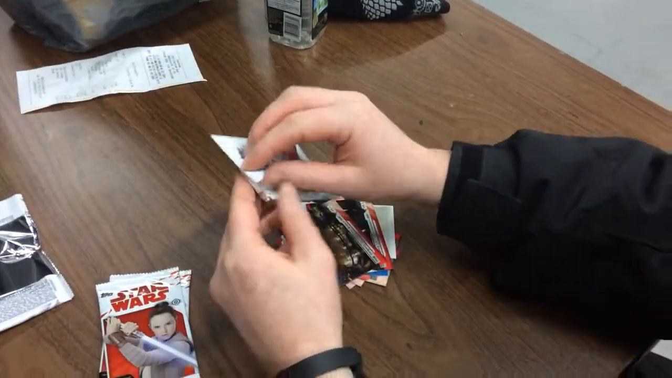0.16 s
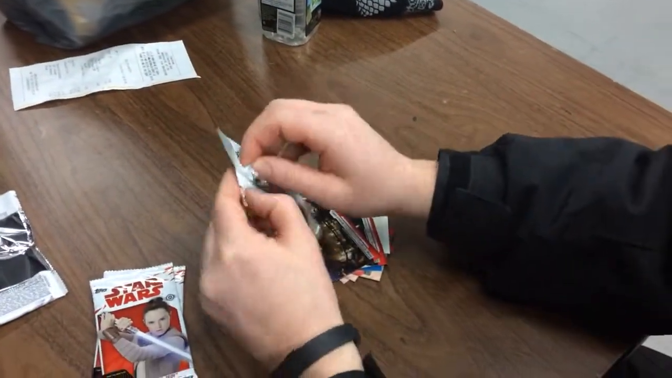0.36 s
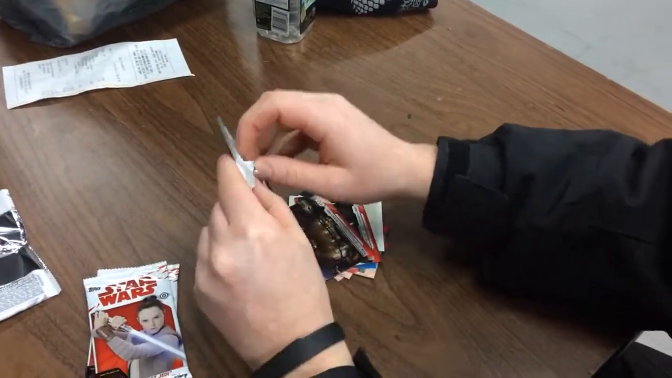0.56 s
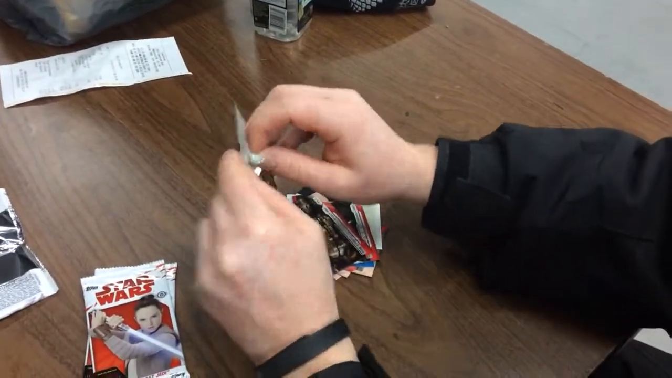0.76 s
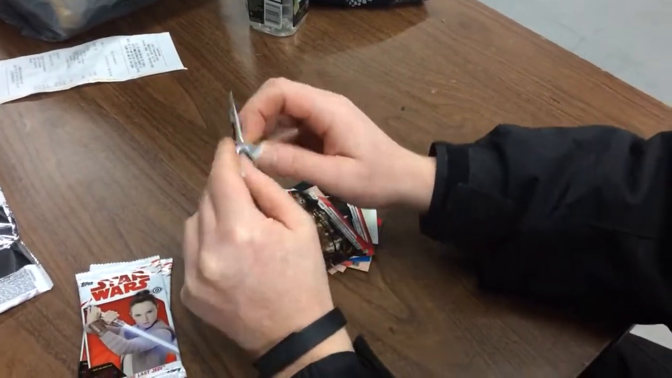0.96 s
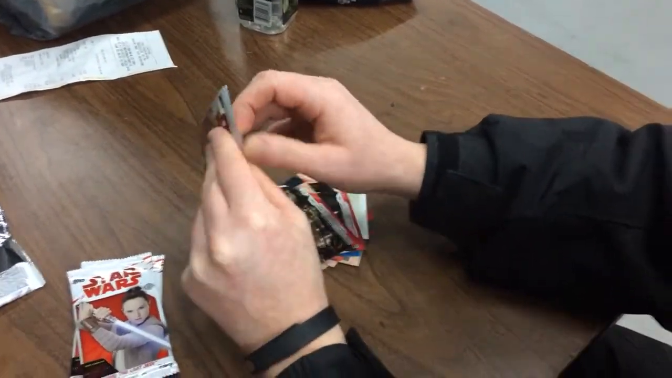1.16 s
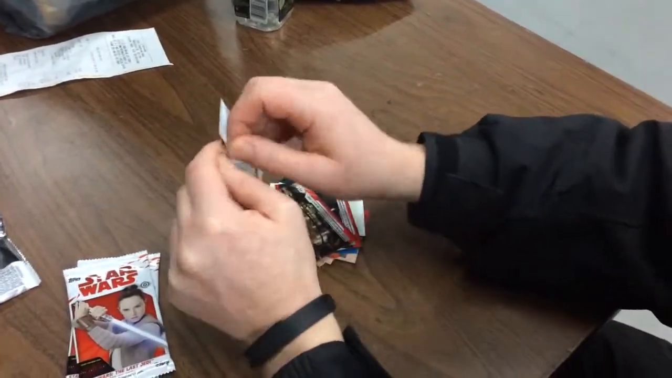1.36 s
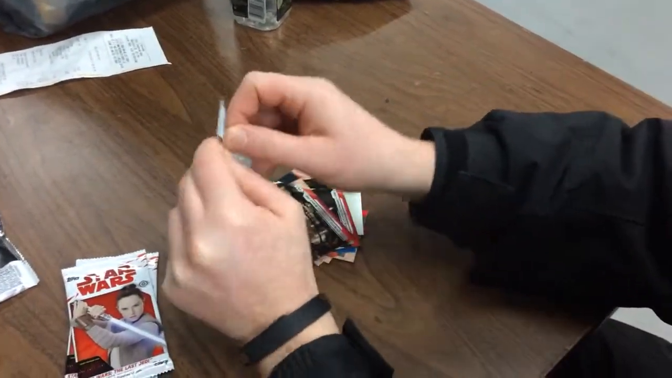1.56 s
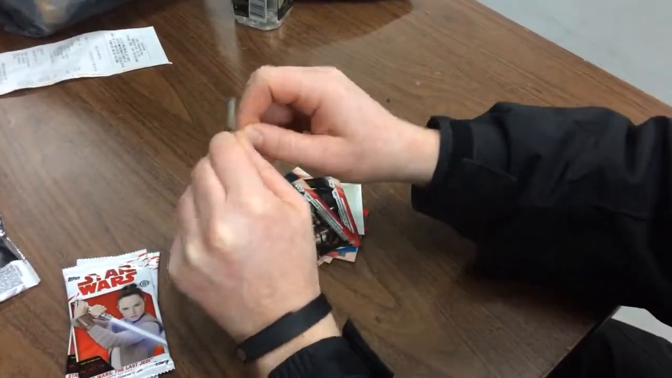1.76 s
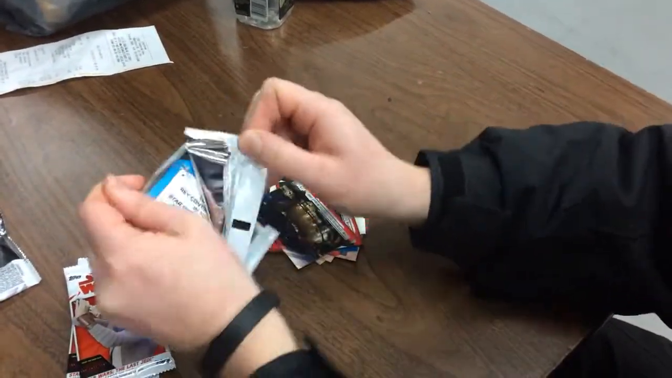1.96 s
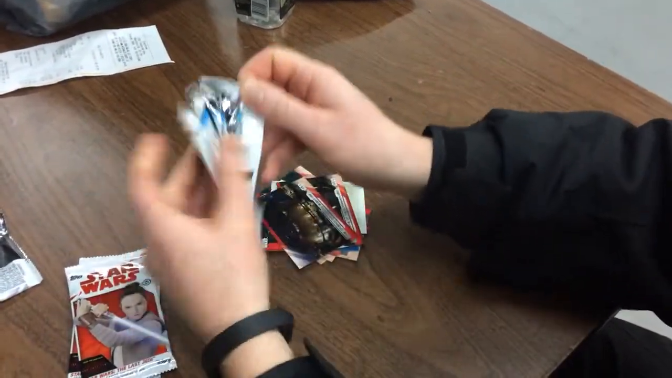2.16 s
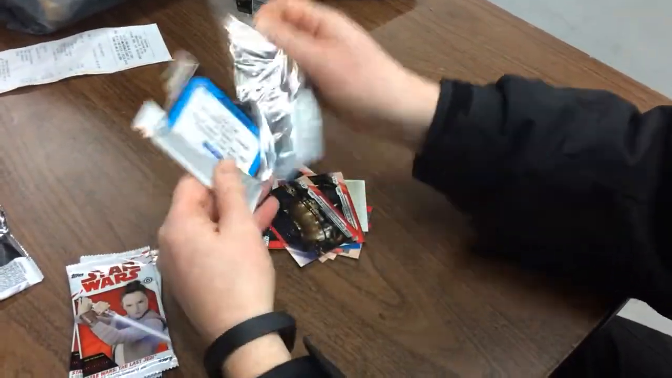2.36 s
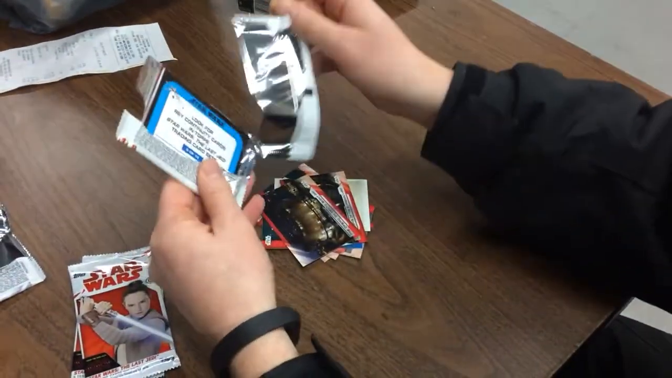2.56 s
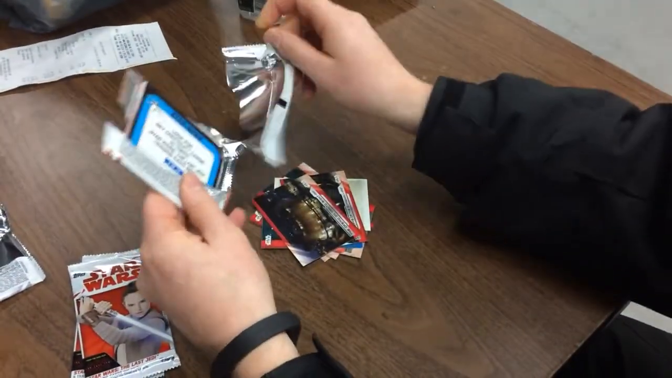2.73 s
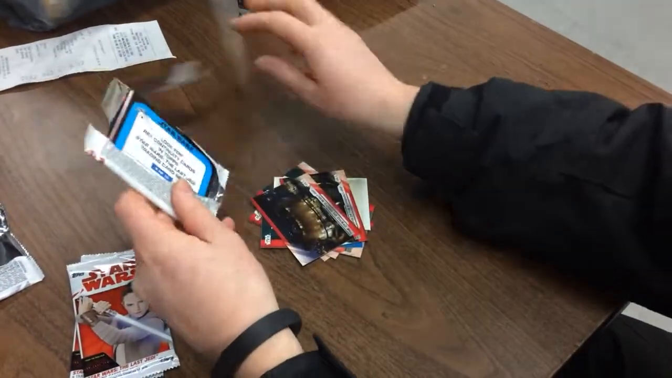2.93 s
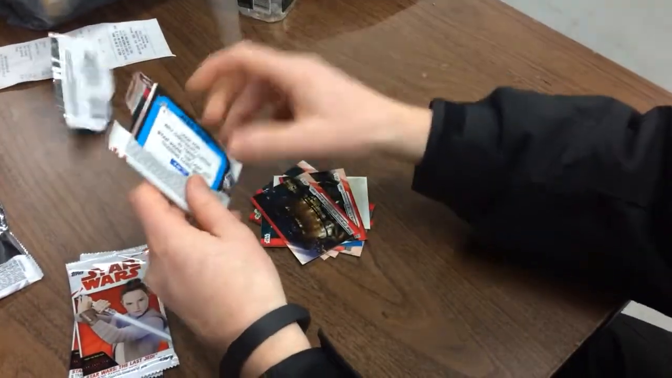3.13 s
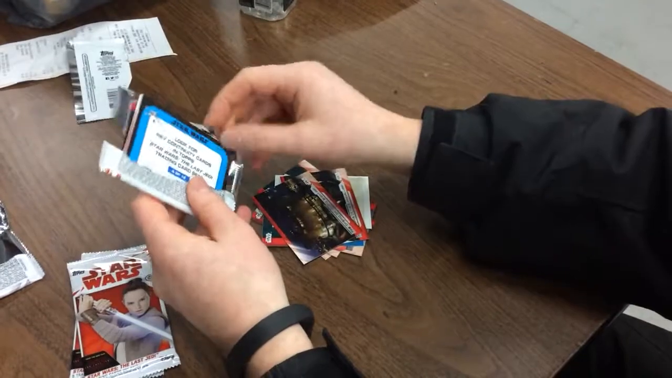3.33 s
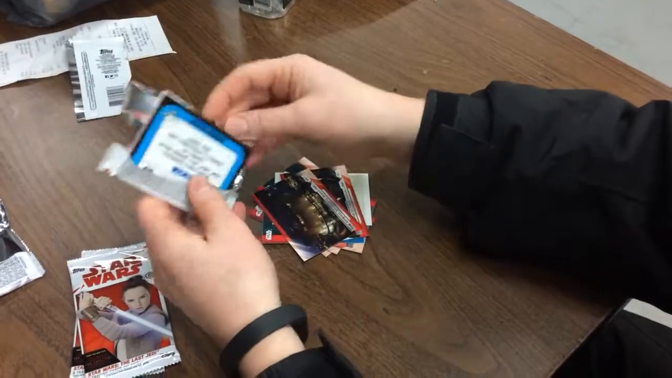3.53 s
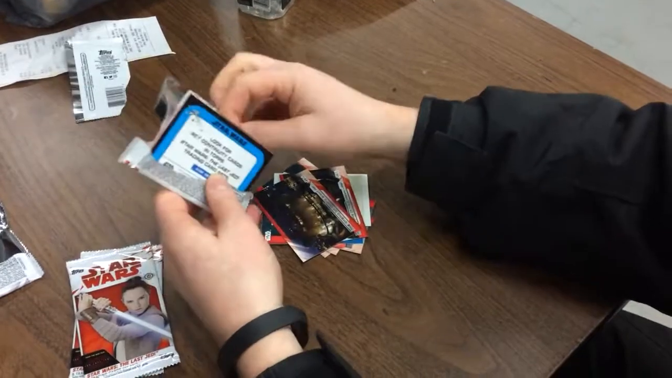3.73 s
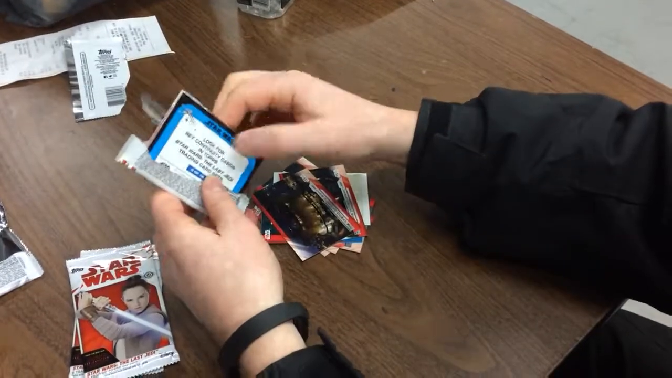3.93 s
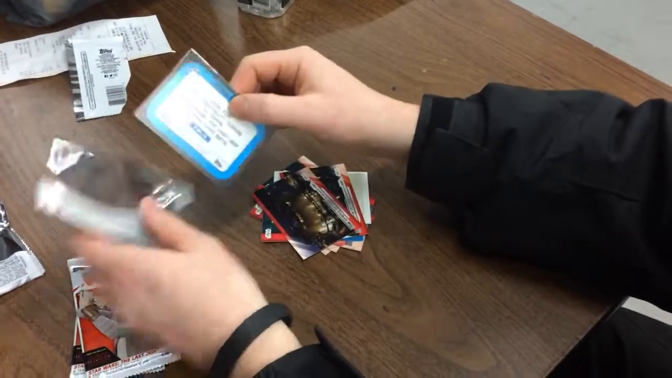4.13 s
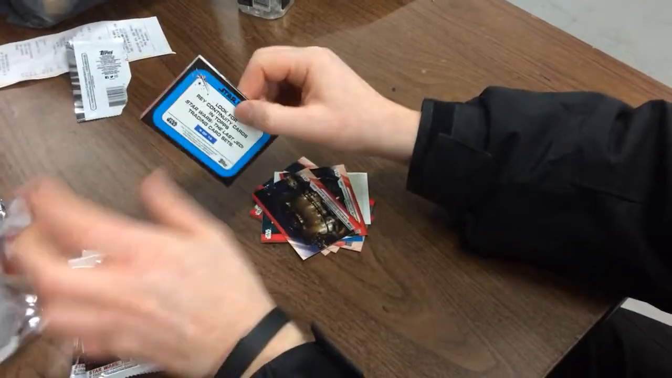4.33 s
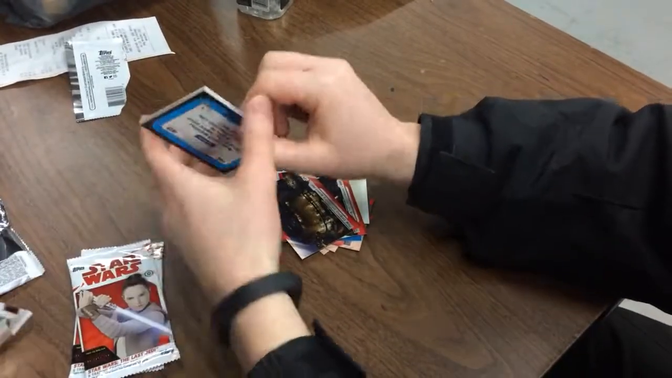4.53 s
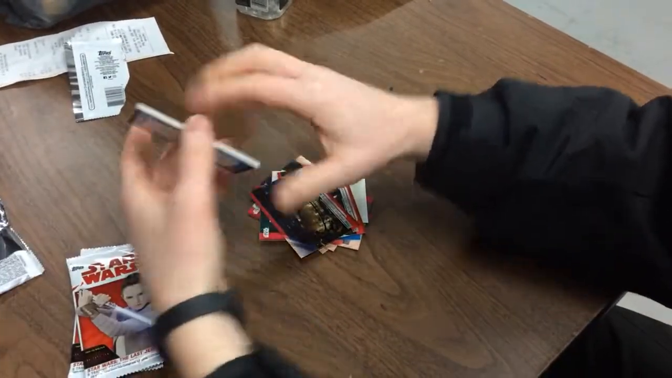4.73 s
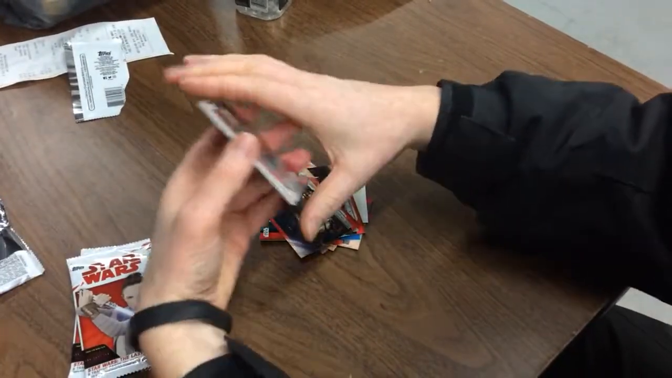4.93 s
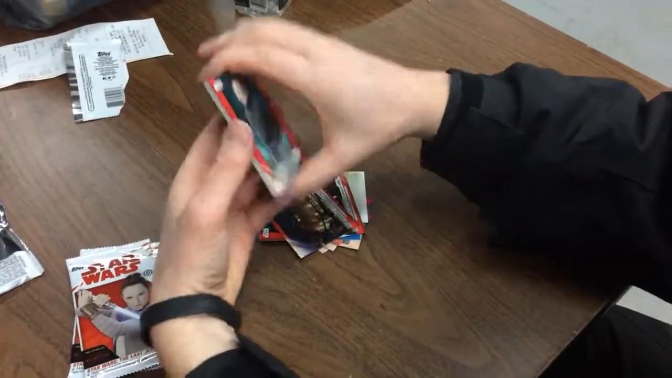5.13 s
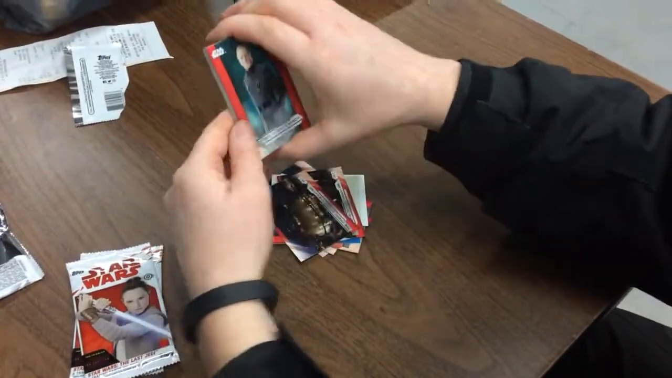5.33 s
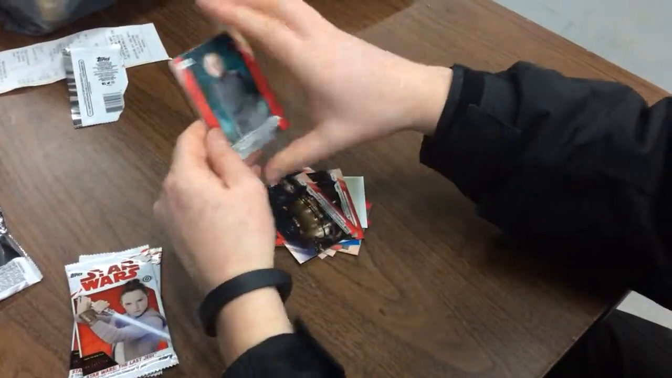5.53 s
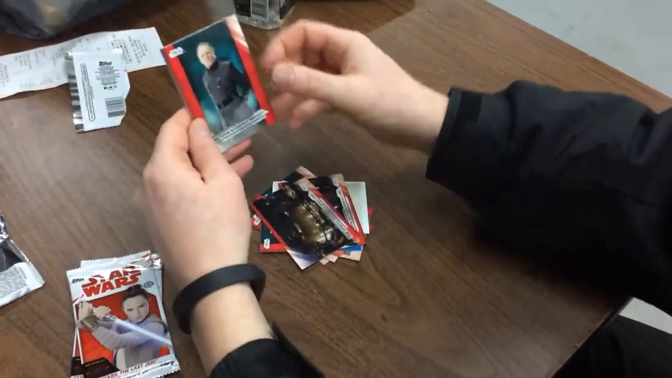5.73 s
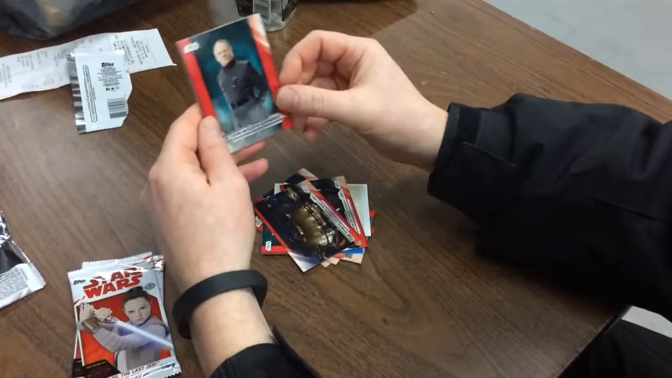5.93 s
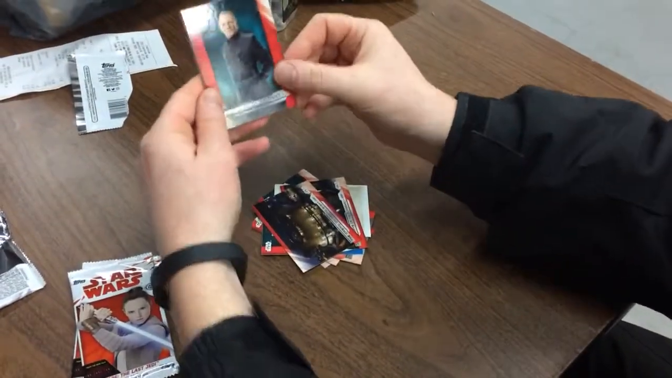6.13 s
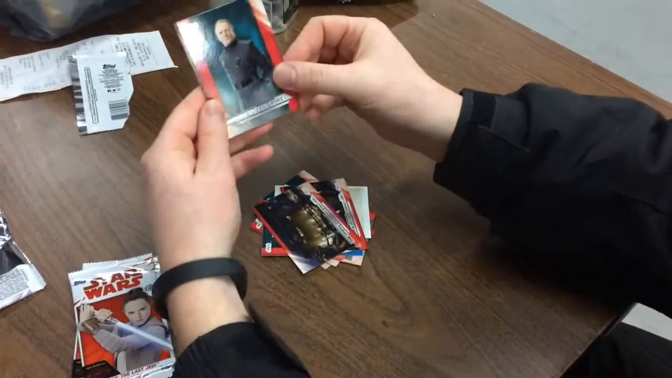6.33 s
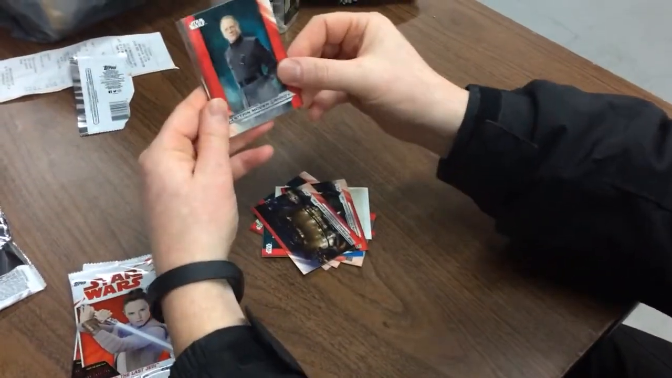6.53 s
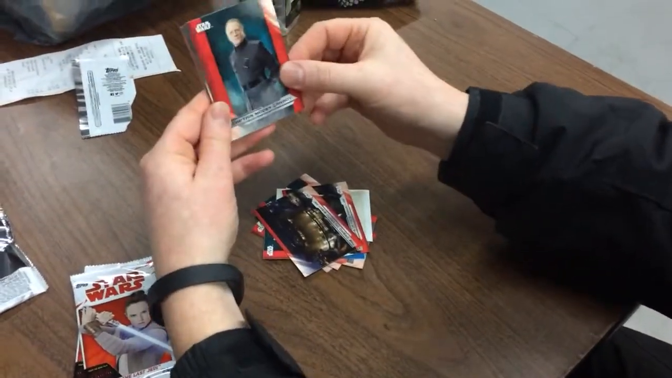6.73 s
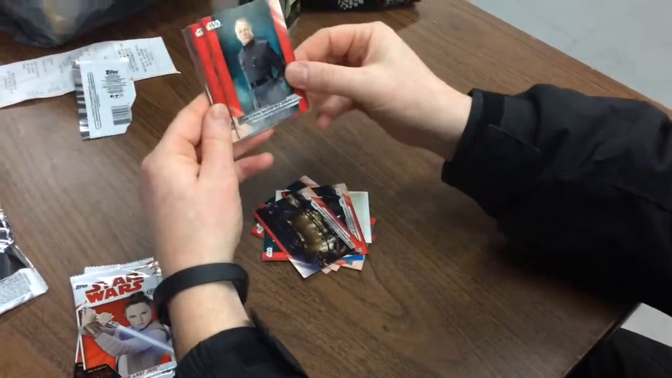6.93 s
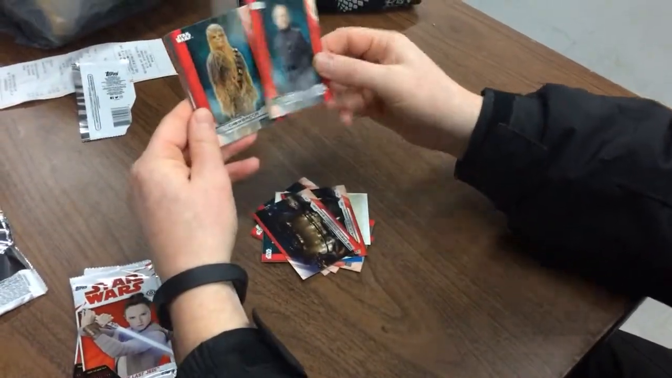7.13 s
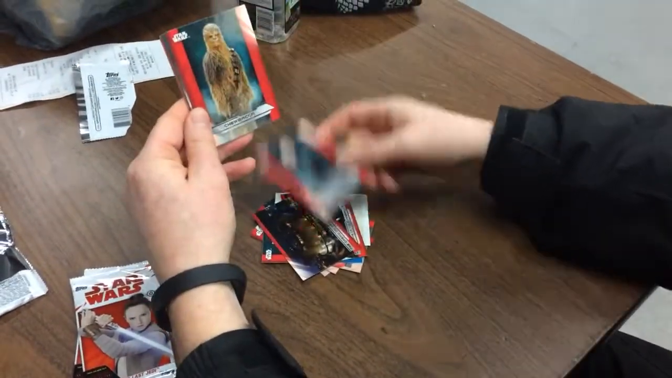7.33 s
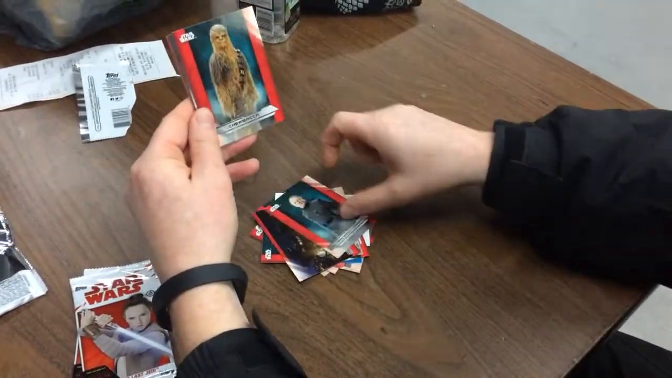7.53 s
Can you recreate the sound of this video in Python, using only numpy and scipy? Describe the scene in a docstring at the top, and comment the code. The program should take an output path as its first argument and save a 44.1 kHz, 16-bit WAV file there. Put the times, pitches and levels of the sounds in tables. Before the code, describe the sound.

Very close to the microphone, fingers pick at a small foil packet with bright sharp snaps and fine crinkle. The crackling peaks in a loud rip and low billowing flap as the wrapper comes away, then thins to scattered ticks and small squeaks. Thin cards slide out, tap and softly rub, ending with a couple of crisp flicks. A quiet indoor room with slight reverberation and a wavering low machine hum.

```python
"""A foil pack of trading cards is picked at, torn open and pulled off by hand, close to the microphone.
Creases buckle in sharp snaps over a fine crinkle; the freed sheet crackles lower and billows as it swings away.
Each crease is a short crack with a cluster of ringing modes; crinkle and tear are trains of tiny creases.
Then cards slide in the fingers as shaped noise, with taps, squeaks and a thumb scuff of ringing modes.
Behind the hands are a short room reverberation, wavering machine hum tones and a low rush of air."""
import sys
import numpy as np
from scipy import signal
from scipy.fft import rfft, irfft
from scipy.io import wavfile
from scipy.ndimage import uniform_filter1d

SR = 44100
rng = np.random.default_rng(int(sys.argv[2]) if len(sys.argv) > 2 else 0)


def pcm_store(signal):
    """Save signal as 16-bit PCM."""
    levels = np.round(np.clip(np.atleast_2d(signal), -1, 1) * 32767)
    wavfile.write(sys.argv[1], SR, levels.astype(np.int16).T)


N = 338895

RING_SIZE = 1024  # samples in one short ring


def from_db(db):
    """Decibels to gain."""
    return 10 ** (np.asarray(db) / 20)


def rms_one(x):
    """Scale to rms 1."""
    return x / np.sqrt(np.mean(x ** 2) + 1e-20)


def energy_one(x):
    """Scale to total energy 1."""
    return x / np.sqrt(np.sum(x ** 2) + 1e-20)


def gain_at(colour, hz):
    """Gain of a spectrum at given frequencies, interpolated over log frequency."""
    points, levels = np.transpose(colour)
    return from_db(np.interp(np.log(hz + 1), np.log(points), levels))


def noise(colour, size=N):
    """Noise of a given colour, rms 1."""
    spectrum = rfft(rng.standard_normal(size))
    return rms_one(irfft(spectrum * gain_at(colour, np.fft.rfftfreq(size, 1 / SR)), size))


def drift(rate_hz):
    """Slow random wandering, rms 1, with rate_hz new values a second."""
    steps = np.arange(N) / SR * rate_hz
    return rms_one(np.interp(steps, np.arange(4096), rng.standard_normal(4096)))


def add(out, s, sound):
    """Mix a sound in at a time in seconds."""
    i = int(np.clip(s * SR, 0, N - 1))
    out[i:i + len(sound)] += sound[:N - i]


def machine():
    """A wavering hum over the low rush of moving air: unsteady tones and coloured noise."""
    # spectrum of the moving air: hz, relative_db
    air_colour = [(25, -24.5), (58, -11.5), (80, -12), (110, -17), (135, -7.5), (175, -11.5), (215, -14),
                  (300, -22.5), (480, -28.5), (750, -34), (1500, -36), (3000, -47.5), (7000, -53.5),
                  (16000, -63)]
    # tones of the machine: hz, rms_db, unsteadiness (0-1)
    hum_tones = [(93.6, -52.5, 0.7), (119.6, -43.5, 0.1), (153.1, -54, 1), (237.4, -63, 0.9),
                 (258.4, -62, 1), (335.7, -63.5, 0.55), (599, -62.5, 0)]
    t = np.arange(N) / SR
    air = noise(air_colour)
    above_hum = signal.sosfiltfilt(signal.butter(4, 170, "high", fs=SR, output="sos"), air)
    out = from_db(-53.0) * air / np.std(above_hum)  # the part above 170 Hz has this level
    for hz, level_db, unsteady in hum_tones:
        waver = np.clip(unsteady, 0, 1)
        # steady part plus random swings of level and phase
        swing = np.sqrt(2 * (1 - waver ** 2)) + waver * (drift(14) + 1j * drift(14))
        turning = np.exp(2j * np.pi * (hz * t + rng.random()))
        out = out + from_db(level_db) * np.real(swing * turning)
    return out


def room(x, first_s=0.0047, build_s=0.003, wall_hz=9000):
    """Dense, slightly dull reflections build up after the direct sound and die away."""
    t60_s, wet_db = 0.55, -21.5
    t = np.arange(SR // 2) / SR
    decay = from_db(-60 * t / t60_s)
    build_up = np.clip((t - first_s) / build_s, 0, 1)
    tail = rng.standard_normal(len(t)) * decay * build_up
    tail = signal.sosfilt(signal.butter(1, min(wall_hz, .45 * SR), fs=SR, output="sos"), tail)
    return from_db(wet_db) * signal.fftconvolve(x, energy_one(tail))[:N]


def crease(hz, crack_share, ring_t60, edge_hz, top_ratio, crack_t60=0.0009, spread_octaves=0.69,
           scatter_db=2.0, spread_s=0.00029):
    """A crease flips: a crack of a few cycles, then the many modes of the facets around it; energy 1."""
    # strength of the facet modes: hz, relative_db
    facet_colour = [(1200, -22), (2550, -16.5), (3250, 5.5), (3900, -1), (4550, 1), (5200, -2.5),
                    (7000, -4.5), (10000, -4), (16000, -1)]
    t = np.arange(RING_SIZE) / SR
    crack = np.cos(2 * np.pi * hz * t) * from_db(-60 * t / crack_t60)
    # a facet this small radiates little below its edge frequency, or far above its own pitch
    top_hz = np.clip(hz * top_ratio, SR / 10, SR / 2.5)
    band = signal.butter(3, [min(edge_hz, top_hz / 2), top_hz], "band", fs=SR, output="sos")
    crack = energy_one(signal.sosfilt(band, crack))
    modes = np.linspace(1200, 16000, 90) + rng.uniform(-80, 80, 90)
    near = np.exp(-(np.log2(modes / hz) / spread_octaves) ** 2 / 2)
    scatter = from_db(scatter_db * rng.standard_normal(len(modes)))
    signs = rng.choice([-1, 1], len(modes))
    strengths = gain_at(facet_colour, modes) * near * scatter * signs
    # bending waves take a moment to spread from the crease over the facets
    envelope = (1 - np.exp(-t / spread_s)) * from_db(-60 * t / ring_t60)
    ring = energy_one(strengths @ np.sin(2 * np.pi * np.outer(modes, t)) * envelope)
    share = np.clip(crack_share, 0, 1)  # of the energy
    return energy_one(np.sqrt(share) * crack + np.sqrt(1 - share) * ring)


def flex(colour, t60, low_hz):
    """A broad sheet answers with a short low ring; held in the fingers it has no deep modes; energy 1."""
    ring = noise(colour, size=RING_SIZE) * from_db(-60 * np.arange(RING_SIZE) / SR / t60)
    return energy_one(signal.sosfilt(signal.butter(3, low_hz, "high", fs=SR, output="sos"), ring))


def deepest_hz(level_db, usual_hz, octaves_per_db=0.08):
    """A stronger buckle moves a larger part of the sheet, which rings deeper."""
    return float(np.clip(usual_hz * 2 ** (-octaves_per_db * (level_db + 40)), 150, 2500))


def runs(rows, jitter=0.3):
    """Each flip sets off the next, a little weaker: one row for every flip."""
    flip_gap_s, flip_loss_db = 0.0055, 1.05  # the gap before jitter, the loss at each flip
    gaps = flip_gap_s * (1 + jitter * rng.uniform(-0.39, 1, (len(rows), 8)))
    flipped = []
    for (s, level_db, hz, low_db, flips), gap in zip(rows, gaps):
        for k in range(int(round(flips))):
            flipped.append((s + gap[:k].sum(), level_db - flip_loss_db * k, hz, low_db))
    return flipped


def snaps(rows, body, crack_share, ring_t60, edge_hz, top_ratio, body_t60, body_low_hz, bright_db, body_db):
    """Each snap is a faint first creep, the crease itself and the sheet or deck that it shakes."""
    creep_s, creep_db = 0.0022, -20  # mean lead over the snap, level against it
    out = np.zeros(N)
    span = np.sqrt(.005 * SR)  # levels are taken over 5 ms
    for s, level_db, hz, low_db in rows:
        bright = from_db(bright_db) * crease(hz, crack_share, ring_t60, edge_hz, top_ratio)
        low_hz = deepest_hz(level_db + low_db, body_low_hz)
        low = from_db(low_db + body_db) * flex(body, body_t60, low_hz)
        creep = crease(hz, crack_share / 2, ring_t60, edge_hz, top_ratio)
        add(out, s - creep_s * (.5 + rng.random()), from_db(level_db + creep_db) * span * creep)
        add(out, s, from_db(level_db) * span * (bright + low))
    return out


def grains(rings, per_s, size_db, even_s, wander=.17, spread=.2):
    """Tiny slips of uneven size come at random, into rings of wandering pitch; running level 1."""
    born = rng.random(N) < per_s / SR
    sizes = from_db(size_db * np.minimum(rng.exponential(1, N), 4))
    sizes = born * sizes * rng.choice([-1, 1], N)
    running_power = np.abs(uniform_filter1d(sizes ** 2, int(even_s * SR) + 1))
    sizes = sizes / np.sqrt(running_power + 1e-6)
    place = .5 + wander * drift(45) + spread * rng.standard_normal(N)
    dealt = (place % 1 * len(rings)).astype(int)  # which ring each slip excites
    out = np.zeros(N)
    for i in np.flatnonzero(born):
        add(out, i / SR, sizes[i] * rings[dealt[i]])
    return out


def sliding(skirt=3.15):
    """Gains of hiss and rub: each slide swells and fades in a smooth bell over a faint hold."""
    # cards slide over foil, fingers or each other:
    # middle_s, bell_width_s, hiss_db (before the trim in cards), rub_db
    slides = [(3.177, 0.016, -51.5, -57), (3.26, 0.96, -65.5, -64), (3.433, 0.047, -52.5, -57),
              (4.131, 0.095, -50.5, -56), (4.2, 0.016, -51, -47), (4.557, 0.3, -67, -64),
              (4.919, 0.47, -61.5, -64.5), (5.813, 0.28, -67.5, -69), (6.215, 0.13, -63.5, -54.5),
              (7.352, 0.32, -61, -57), (7.512, 0.066, -56, -56), (7.647, 0.21, -66, -68)]
    hold_hiss_db, hold_rub_db = -84.5, -70  # cards merely held in the fingers
    t = np.arange(N) / SR
    power = from_db([[hold_hiss_db], [hold_rub_db]]) ** 2
    for middle, width, hiss_db, rub_db in slides:
        bell = (1 + ((t - middle) / width) ** 2 * 2) ** -skirt
        power = power + (from_db([[hiss_db], [rub_db]]) * bell) ** 2
    return np.sqrt(power)


def scuff(t60=0.031):
    """A thumb's quick slips over the top card ring its modes, which sag as it bends, under one smooth stroke."""
    # bending modes of the card at mid-stroke: hz, relative_db
    card_modes = [(440, 1), (670, -1.5), (970, -5), (1450, -4)]
    middle_s, width_s, level_db = 6.207, 0.024, -54
    slips_per_s, sag_oct_per_s = 350, 4.7
    out, t = np.zeros(N), np.arange(2 * RING_SIZE) / SR
    hz, mode_db = np.transpose(card_modes)
    for offset in np.arange(-2 * width_s, 2 * width_s, 1 / slips_per_s):
        modes = np.sin(2 * np.pi * np.outer(hz * 2 ** (-sag_oct_per_s * offset), t))
        strengths = from_db(mode_db) * rng.standard_normal(len(hz))
        ring = energy_one(strengths @ modes * from_db(-60 * t / t60))
        stroke = np.exp(-(offset / width_s) ** 2 / 2)
        add(out, middle_s + offset + rng.random() / slips_per_s, stroke * ring)
    return from_db(level_db) * np.sqrt(SR / slips_per_s) * out


def squeaks(width_hz=700, rise_octaves=0.12):
    """Rapid uneven slips of the card's edge make a rough tone that rises through the stroke."""
    # an edge catches on the foil or the next card: middle_s, bell_width_s, pitch_hz, level_db
    catches = [(3.45, 0.005, 6200, -36.5), (3.857, 0.011, 2720, -44.5), (3.917, 0.0056, 4100, -36.5)]
    out, t = np.zeros(N), np.arange(N) / SR
    stumble = np.sqrt(2 * np.pi * width_hz / SR) * rng.standard_normal(N)  # random phase steps
    for s, width, hz, level_db in catches:
        along = np.clip((t - s) / width, -10, 10)
        phase = np.cumsum(2 * np.pi * hz * 2 ** (rise_octaves * along) / SR + stumble)
        out += from_db(level_db) * np.exp(-along ** 2) * np.sqrt(2) * np.sin(phase)
    return out


def cards():
    """Smooth card faces hiss as they slide, hands rub dully, and the edges tick and knock the deck."""
    # edges flicked, knocked together and laid down:
    # start_s, level_db (over 5 ms, before trims), pitch_hz, low_ring_db (against the tap), flips (count)
    card_taps = [(4.2104, -44.5, 5800, -7, 1), (4.3699, -51, 5300, -8, 1), (4.4094, -48.5, 7100, -14, 1),
                 (4.5129, -56, 6850, 2.5, 1), (4.894, -41.5, 8500, -8, 2), (5.1276, -54.5, 6700, -22, 1),
                 (7.1579, -53, 7250, -7, 1), (7.4832, -46.5, 5080, -1, 1), (7.4932, -39.5, 6100, -1, 2),
                 (7.5187, -38, 3520, -30, 1)]
    # spectrum of card faces sliding: hz, relative_db
    slide_colour = [(1000, -14.5), (2500, -7), (5000, -4.5), (8000, -4), (12000, -7.5), (16000, -16.5)]
    # spectrum of the dull rubbing: hz, relative_db
    rub_colour = [(200, -2.5), (400, -2.5), (700, -10), (1400, -8), (2500, -14), (5000, -25)]
    # spectrum of the knocked deck: hz, relative_db
    deck_colour = [(500, -5), (800, 5), (1150, 5.5), (1500, 2.5), (2300, 3.5), (3500, -6), (6000, -16)]
    grain_db = 1.9  # rms flutter of the rubbing level
    hiss_gain, rub_gain = sliding()
    hiss = hiss_gain * from_db(3.0 + grain_db * drift(250)) * noise(slide_colour)  # 3 dB trim
    rub = rub_gain * from_db(grain_db * drift(120)) * noise(rub_colour)
    taps = snaps(runs(card_taps), deck_colour, crack_share=0.4, ring_t60=0.014, edge_hz=2100, top_ratio=3.0,
                 body_t60=0.018, body_low_hz=550, bright_db=0.5, body_db=0.5)
    return hiss + rub + taps + scuff() + squeaks()


def billow():
    """The freed sheet fills with air as it is swung away: a low flutter swells to a thump and drops."""
    # spectrum of the flutter: hz, relative_db
    flutter_colour = [(170, -25), (270, -7), (480, 2.5), (620, -3.5), (1000, -21)]
    peak_s, level_db = 2.477, -32
    rise_s, fall_s = 0.09, 0.036  # time to rise or fall by 20 dB
    t = np.arange(N) / SR - peak_s
    away = np.clip(np.maximum(-t / rise_s, t / fall_s), 0, 10)
    return from_db(level_db - 20 * away) * noise(flutter_colour)


def pops(t60=0.0096):
    """One broad panel of wrapper or bent card flips like a drum skin, ringing briefly at one low pitch."""
    # panels popping through: start_s, pitch_hz, peak_db
    panels = [(0.8915, 851, -26.5), (1.9692, 1599, -20.5), (2.038, 571.5, -27), (2.3843, 1302, -20),
              (2.435, 1042, -17), (2.474, 483, -18), (4.893, 890, -36)]
    out, t = np.zeros(N), np.arange(2 * RING_SIZE) / SR
    for s, hz, peak_db in panels:
        add(out, s, from_db(peak_db - 60 * t / t60) * np.sin(2 * np.pi * hz * t))
    return out


def tearing(fade_s=0.0059):
    """The running tear parts the film in thousands of tiny fractures a second: a bright, even zip."""
    # the tear runs on through the film: start_s, length_s, level_db
    tears = [(0.284, 0.03, -34.5), (0.395, 0.027, -32), (1.444, 0.03, -42), (1.664, 0.14, -49),
             (2.394, 0.028, -31), (2.456, 0.02, -22.5)]
    t, gain = np.arange(N) / SR, np.zeros(N)
    for start, length, level_db in tears:
        away = np.maximum(start - t, t - start - length) / fade_s  # 20 dB for each fade_s
        gain = np.maximum(gain, from_db(level_db - 20 * np.clip(away, 0, 10)))
    fractures = [crease(hz, crack_share=.5, ring_t60=0.006, edge_hz=3000, top_ratio=2)
                 for hz in np.linspace(3600, 15000, 60)]
    return gain * grains(fractures, per_s=2800, size_db=2.5, even_s=0.01, spread=.5)


def pulling():
    """Gains of crinkle and sheet: each pull builds, holds and lets go, a long one more slowly."""
    # the fingers pinch and pull the wrapper:
    # start_s, hold_s, fine_crinkle_db, sheet_flexing_db (both before the trims in wrapper)
    pulls = [(0.0, 0.07, -58, -70), (0.258, 0.2, -43, -56.5), (0.425, 0.05, -39.5, -57),
             (0.59, 0.043, -42.5, -54.5), (0.753, 0.033, -36.5, -61), (0.864, 0.032, -33, -52.5),
             (1.061, 0.038, -37, -51.5), (1.279, 0.064, -50.5, -61), (1.5, 0.053, -47, -63),
             (1.677, 0.18, -50, -63), (1.955, 0.055, -28.5, -39), (2.02, 0.025, -27.5, -34.5),
             (2.073, 0.18, -50, -54.5), (2.389, 0.1, -28, -34), (2.457, 0.023, -24, -30),
             (2.575, 0.068, -54.5, -55), (2.842, 0.077, -48, -54), (3.892, 0.028, -45.5, -52.5)]
    attack, release = 0.59, 0.9  # time to rise or fall by 20 dB, as a share of the hold
    t, gains = np.arange(N) / SR, np.zeros((2, N))
    for start, hold, fine_db, sheet_db in pulls:
        phase = (t - start) / max(hold, .005)
        away = np.maximum(-phase / attack, (phase - 1) / release)
        gain = from_db([[fine_db], [sheet_db]]) * from_db(-20 * np.clip(away, 0, 10))
        gains = np.maximum(gains, gain)
    return gains


def wrapper():
    """Loud snaps stand out of a crinkle of small creases, stray ticks and the crackle of the bending sheet."""
    # creases giving way, some in a quick run of flips:
    # start_s, level_db (over 5 ms), pitch_hz, low_ring_db (against the snap, before body_db), flips (count)
    foil_snaps = [(0.0392, -40.5, 8600, -14.5, 1), (0.1183, -23.5, 8100, -21, 1),
                  (0.1404, -27.5, 9000, -18, 1), (0.1665, -37, 5200, -16.5, 1),
                  (0.2523, -36, 4800, -11.5, 1), (0.2604, -39, 9000, -5.5, 2), (0.2825, -28, 7900, -12, 1),
                  (0.3459, -36.5, 7500, -4, 1), (0.3097, -24.5, 8300, -30, 1), (0.3291, -22, 6400, -23, 1),
                  (0.3565, -24, 9000, -28, 1), (0.3603, -20, 6800, -29, 1), (0.3656, -26, 5200, -23.5, 1),
                  (0.3769, -25, 8100, -20, 2), (0.4, -29, 9400, -25, 1), (0.4099, -25.5, 8650, -17.5, 2),
                  (0.431, -16.5, 5850, -26, 1), (0.4439, -32.5, 8200, -28, 2),
                  (0.4568, -31.5, 9300, -22, 3), (0.4783, -40.5, 9200, -20, 3),
                  (0.5195, -36, 9300, -11.5, 1), (0.5906, -38.5, 7500, -16.5, 1),
                  (0.6106, -31, 8600, -23, 1), (0.6932, -33.5, 5740, -13.5, 1),
                  (0.7381, -38, 5800, -11.5, 1), (0.7563, -27.5, 7050, -24.5, 2),
                  (0.7761, -30, 8800, -30, 1), (0.7917, -29.5, 12500, -21.5, 1),
                  (0.8691, -21, 6200, -27, 1), (0.8841, -16, 7200, -23.5, 2),
                  (0.9533, -37.5, 8850, -12.5, 1), (0.9665, -37, 9400, -9.5, 1), (1.069, -35, 8700, -20, 1),
                  (1.1169, -33.5, 8600, -12.5, 1), (1.1491, -32, 7600, -41, 1), (1.2884, -31, 6100, -19, 2),
                  (1.3167, -27.5, 5750, -15, 2), (1.337, -26, 4300, -10.5, 1), (1.3796, -27, 7300, -18, 3),
                  (1.4028, -27, 9400, -27, 1), (1.5405, -23.5, 6150, -21, 1), (1.5235, -38, 8000, -9, 1),
                  (1.5525, -37, 7000, -8, 1), (1.837, -38, 7900, -26, 1), (1.9025, -34.5, 7500, -17, 1),
                  (1.6473, -28, 6300, -23, 1), (1.7005, -24.5, 8050, -26, 1), (1.7815, -33, 7560, -16.5, 1),
                  (1.9268, -24.5, 6000, -19.5, 1), (1.9458, -25.5, 10800, -19.5, 1),
                  (1.9568, -26, 8000, -12.5, 2), (1.9697, -25.5, 7000, -11, 1), (1.9808, -28, 5400, -6, 2),
                  (1.9975, -24.5, 7200, -7.5, 1), (2.0372, -27.5, 6200, -3.5, 1),
                  (2.0611, -28, 4570, -9, 1), (2.083, -33, 7050, -7.5, 1), (2.2325, -31, 5500, -10.5, 1),
                  (2.296, -32.5, 6000, -7.5, 1), (2.1499, -26, 7340, -9, 1), (2.1859, -23.5, 7650, -20, 1),
                  (2.2439, -27.5, 5900, -6, 2), (2.282, -19, 6400, -12.5, 1), (2.3304, -19.5, 7700, -12, 1),
                  (2.3635, -22.5, 9000, -24, 1), (2.3848, -21.5, 7340, -5, 1),
                  (2.4015, -27, 5600, -13.5, 1), (2.4115, -21, 6500, -12, 1),
                  (2.4135, -17.5, 5300, -15.5, 1), (2.4215, -20.5, 7800, -16.5, 1),
                  (2.4477, -19.5, 5240, -13, 1), (2.4756, -23, 8700, -9.5, 1), (2.4847, -23.5, 5090, -5, 1),
                  (2.4888, -28.5, 7020, -3, 1), (2.5124, -23, 9100, -25, 1), (2.5301, -24, 7900, -18, 1),
                  (2.5805, -30.5, 7600, -23, 1), (2.7595, -32, 6800, -18, 2), (2.8362, -30, 6750, -15, 1),
                  (2.851, -34, 9000, -14, 1), (2.8619, -28.5, 7800, -10.5, 4), (3.2284, -41, 6600, -29, 1),
                  (3.2518, -31, 8000, -19.5, 1), (3.3367, -40, 10300, -19, 1), (3.4481, -34, 6100, -15, 2),
                  (3.4618, -33, 6200, -10, 1), (3.5282, -37, 8800, -12.5, 1), (3.5665, -39.5, 6300, -8, 1),
                  (3.6833, -39, 7700, -8, 1), (3.7179, -34.5, 7600, -4.5, 2), (3.7359, -33, 7240, -16, 1),
                  (3.7516, -26, 5800, -6.5, 1), (3.8539, -44.5, 6000, -6, 2), (3.9153, -35, 6900, -12.5, 1),
                  (4.0317, -34.5, 9050, -15.5, 1), (4.1635, -26, 6650, -16.5, 1)]
    # spectrum of the bending sheet: hz, relative_db
    sheet_colour = [(150, -23.5), (300, -8), (500, -5), (900, -4), (1500, -1.5), (2200, -5.5), (3200, -2.5),
                    (6000, -32.5)]
    fine_db, sheet_db = 20 * np.log10(pulling())
    small = [crease(hz, crack_share=0.5, ring_t60=0.011, edge_hz=3000, top_ratio=2.8, spread_octaves=0.45)
             for hz in np.geomspace(3600, 14000, 100)]
    fine = from_db(fine_db - 1.5) * grains(small, per_s=670, size_db=4.5, even_s=0.02)
    # small creases tick at random: -49 dB at a light grip (crinkle at -48), with 0.67 of the crinkle's swing
    tick_gain = from_db(-49 + 0.67 * (fine_db + 48))
    ticks = tick_gain * grains(small, per_s=91, size_db=2.5, even_s=0.14)
    tight = [flex(sheet_colour, t60=0.012, low_hz=1320) for _ in range(150)]
    loose = [flex(sheet_colour, t60=0.013, low_hz=560) for _ in range(150)]
    # pinched foil only ticks; once it is pulled wide, the whole sheet flaps
    freedom = 1 / (1 + from_db(-39.5 - sheet_db) ** 2)
    pinched = np.sqrt(1 - freedom) * grains(tight, per_s=550, size_db=9.0, even_s=0.018)
    flapping = np.sqrt(freedom) * grains(loose, per_s=600, size_db=5.5, even_s=0.015)
    sheet = from_db(sheet_db + 1.5) * (pinched + flapping)
    loud = snaps(runs(foil_snaps), sheet_colour, crack_share=0.41, ring_t60=0.012, edge_hz=2800, top_ratio=2.6,
                 body_t60=0.018, body_low_hz=1006, bright_db=0.0, body_db=2.0)
    return fine + ticks + sheet + loud


def scene():
    """Hands close to the microphone, the room behind them."""
    hands = wrapper() + tearing() + pops() + billow() + cards()
    return (hands + room(hands) + machine())[None, :]


def record(dry):
    """The highest peaks are rounded and the top is cut above 16 kHz."""
    rounded = .9 * np.tanh(dry / .9)
    return signal.sosfilt(signal.ellip(10, .2, 70, 16000, fs=SR, output="sos"), rounded)


dry = scene()
out = record(dry)
pcm_store(out)
```